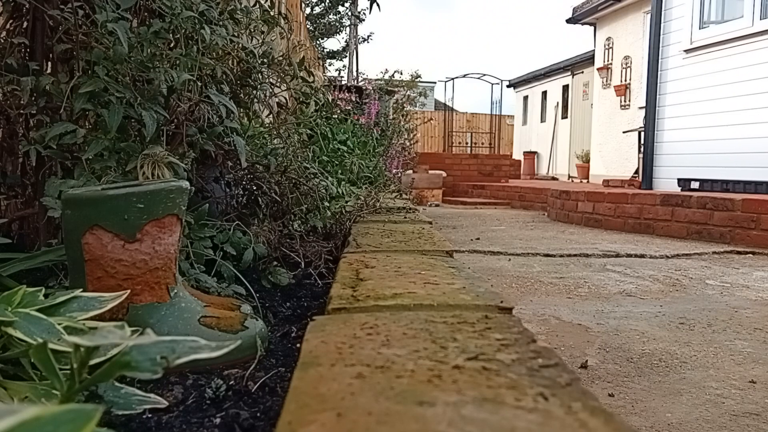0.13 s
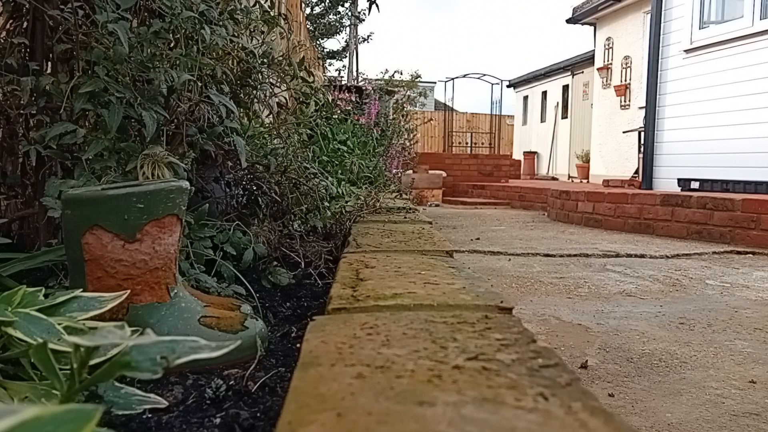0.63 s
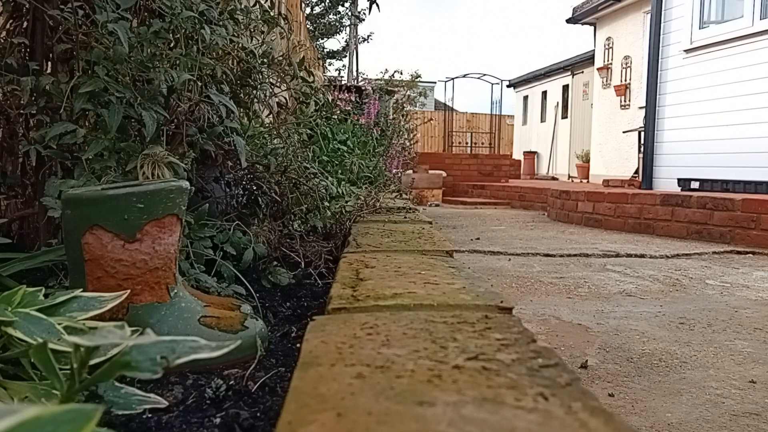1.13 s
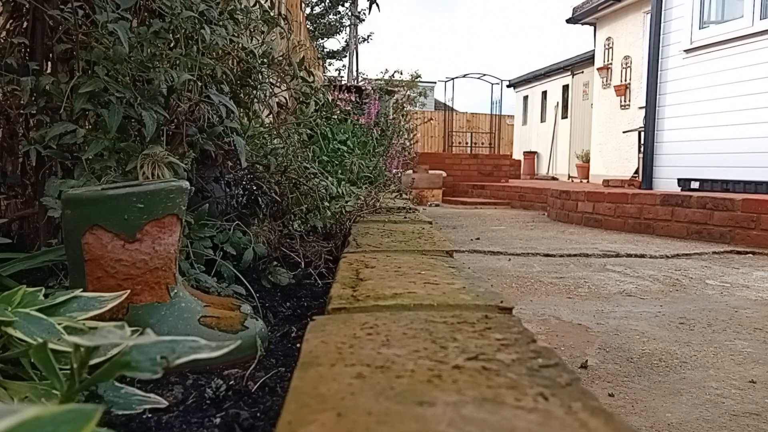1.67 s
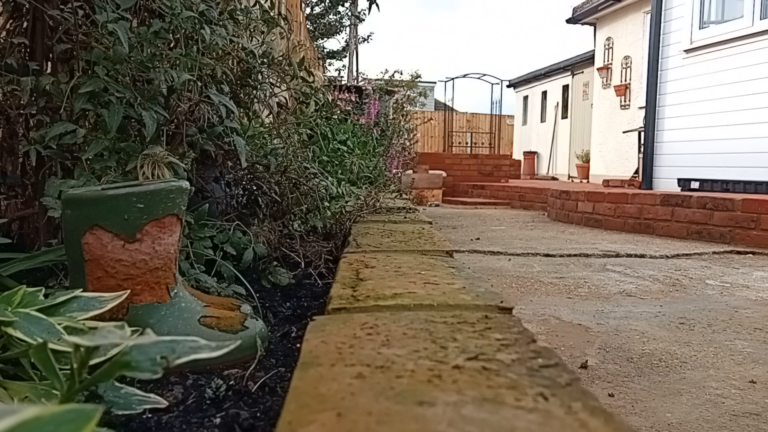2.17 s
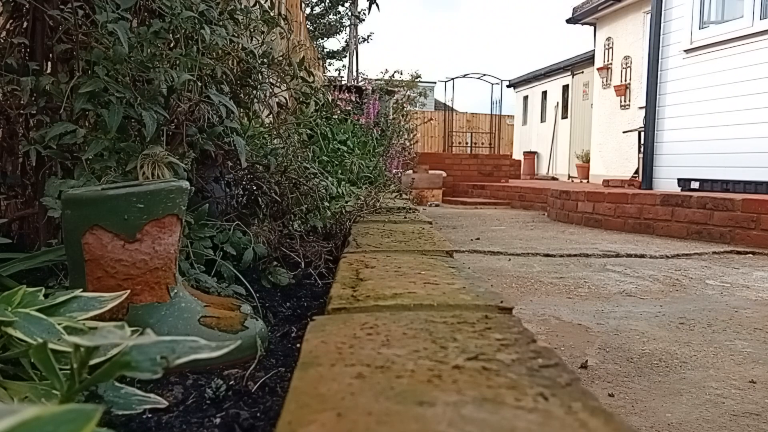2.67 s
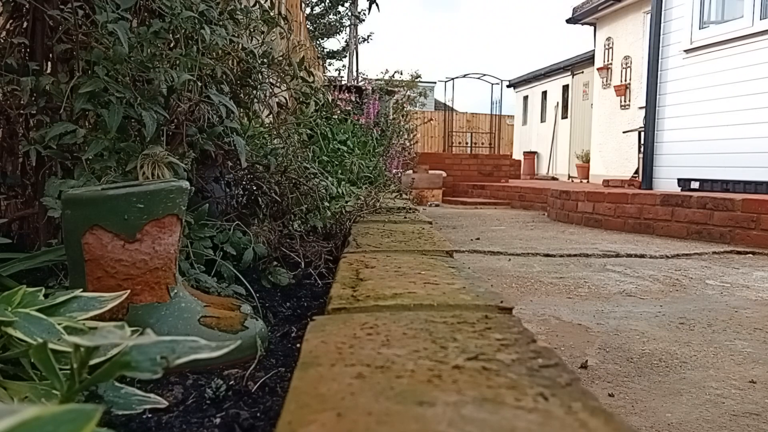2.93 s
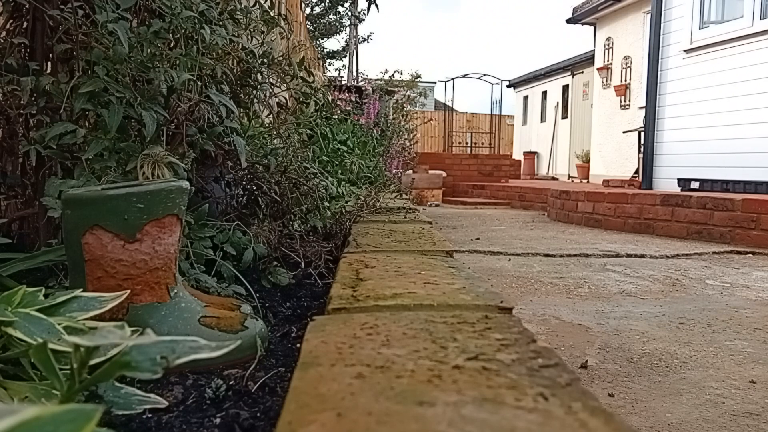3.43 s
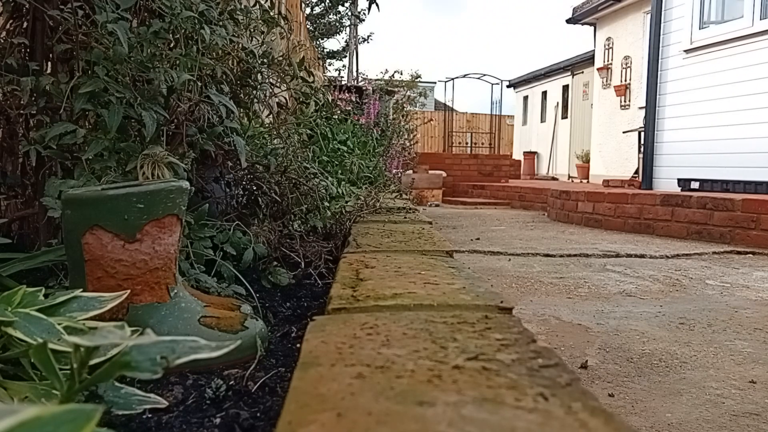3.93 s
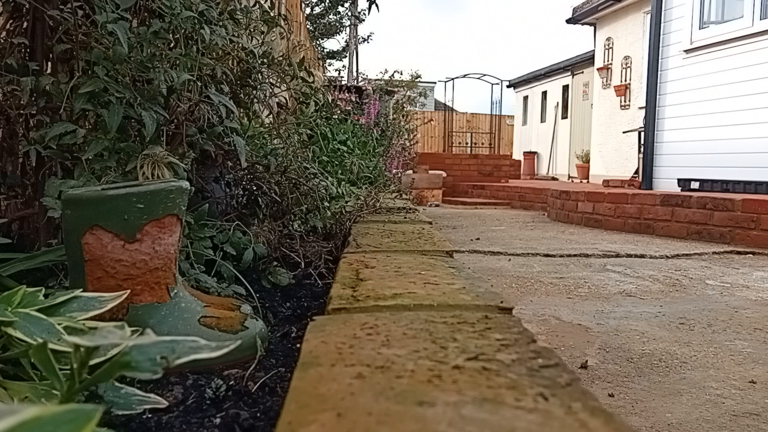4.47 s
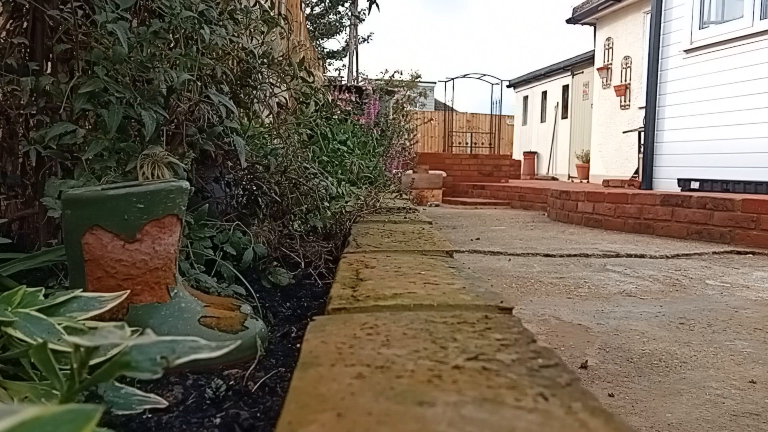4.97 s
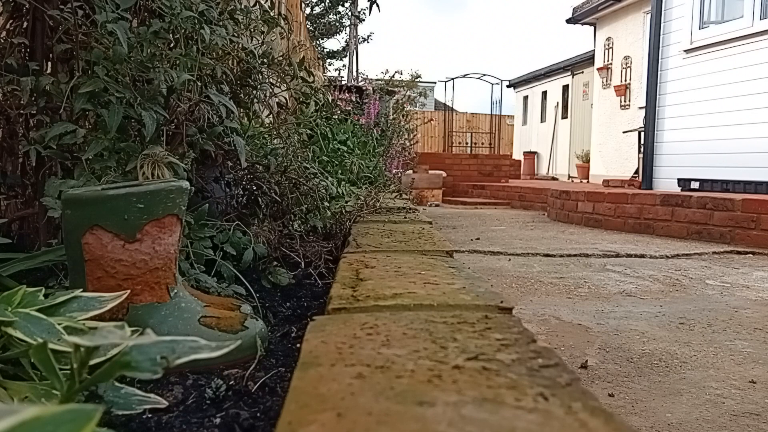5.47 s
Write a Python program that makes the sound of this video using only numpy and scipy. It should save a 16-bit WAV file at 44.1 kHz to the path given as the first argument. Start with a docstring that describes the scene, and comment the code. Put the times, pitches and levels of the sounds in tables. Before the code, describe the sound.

Quiet outdoor air, a soft low-weighted hiss, with a very faint distant engine hum near 68 hertz swelling and fading. At 1.32 s a tiny trigger tick, then at 1.33 s a gas-powered air rifle fires: a dense roaring burst of about 50 milliseconds with a low barrel ring. At 1.40 s the pellet cracks sharply on its target, and echoes from walls and paving die within about a third of a second. The limiter clamps the blast, so it sounds flattened. Close small clicks come at 2.0 s, a far echoing knock at 2.25 s and a fainter one at 2.5 s, with faint ringing tones. From 3.0 s bolt and magazine are handled close by: light ticks and scrapes at 3.4 to 4.3 s, strong metallic clacks at 4.45, 4.77 and 4.86 s. At 5.39 s a low soft bump as the rifle is set down, then a last faint tick at 5.5 s.

```python
"""Quiet outdoor air in a walled garden, hiss drawn as a spectrum, with a distant engine's low harmonics.
A gas-powered air rifle fires once: trigger tick, roaring gas over barrel modes, pellet strike, echoes.
Parts click close by; something far off knocks twice, heard as echo, and faint tones ring.
Then bolt and magazine are worked close by, noise bursts and grains through the rifle's resonances,
and the rifle is set down with a low bump. The recorder's limiter holds the blast down."""
import sys
import numpy as np
from scipy import signal
from scipy.io import wavfile
from scipy.ndimage import uniform_filter1d

SR = 44100
rng = np.random.default_rng(int(sys.argv[2]) if len(sys.argv) > 2 else 0)


def materialize(psi):
    """Save the field psi as 16-bit PCM at rate SR to the path in sys.argv[1].

    A 1-D psi becomes a single channel; in a 2-D psi each row is a channel.
    """
    bounded = np.clip(np.atleast_2d(psi).T, -1, 1)
    quanta = np.round(bounded * 32767).astype(np.int16)
    wavfile.write(sys.argv[1], SR, quanta)


def undo_db(level):
    """Turn decibels back into plain size, where 20 dB means ten times bigger."""
    steps = np.asarray(level, float) / 20
    return 10 ** steps


N = 246959


def evened(x):
    """Scales to rms 1."""
    return x / np.sqrt(np.mean(x ** 2) + 1e-20)


def unit(x):
    """Scales to energy 1."""
    return x / np.linalg.norm(x)


def smooth_noise(size, *lengths):
    """Slow random drift of rms 1: noise under moving averages of the given lengths in samples."""
    drift = rng.standard_normal(size)
    for length in lengths:
        drift = uniform_filter1d(drift, size=length)
    return evened(drift)


def read(points, hz):
    """Value of a table on a log-frequency axis."""
    f, value = np.transpose(points)
    return np.interp(np.log(hz + 1), np.log(f + 1), value)


def add(mix, start_s, sound):
    """Mixes a sound in at its start time."""
    part = mix[round(start_s * SR):][:len(sound)]
    part += sound[:len(part)]


def coloured(x, points):
    """Causal minimum-phase filter with the given dB spectrum."""
    log_gain = np.log(undo_db(read(points, abs(np.fft.fftfreq(4096, 1 / SR)))))
    taps = np.fft.ifft(np.exp(np.conj(signal.hilbert(log_gain)))).real[:2048]
    return signal.oaconvolve(x, taps)[:len(x)]


def band(x, lo_hz, hi_hz):
    """Band-pass."""
    sos = signal.butter(2, [lo_hz, min(hi_hz, .45 * SR)], "bandpass", fs=SR, output="sos")
    return signal.sosfilt(sos, x)


def ring(modes, size=8000):
    """Impulse response of dying modes (hz, level_db, t60_s)."""
    t = np.arange(size) / SR
    return sum(undo_db(db - 60 * t / t60) * np.sin(2 * np.pi * hz * t) for hz, db, t60 in modes)


def blast():
    """Turbulent gas roars out, slaps back off a near wall and pumps up the ringing of barrel and body."""
    # hiss of the gas jet: hz, relative level_db per Hz
    jet_colour = [(60, -21), (120, -8), (250, -2.5), (450, -2), (750, -5), (1200, -4), (3000, -5),
                  (7000, -4), (11000, -6.5), (16000, -8.5)]
    # low modes of barrel and body: hz, relative level_db, t60_s
    barrel = [(143, 10.5, 0.17), (240, -13.5, .12), (345, -8.5, .25), (560, -9.5, .1), (650, 4, .15),
              (946, -12.5, 0.089)]
    valve_open_s, valve_shut_s, build_s = 1.3281, 1.374, 0.0049
    slap_s, slap_db, slap_decay_s = 1.3605, 6, 0.012  # the blast's echo off a near wall lifts the hiss
    jet_db, jet_fade_db_per_s = 3.5, 898
    puff_db, puff_fade_db_per_s = -9.5, 299  # low puff in the barrel, relative to the jet, outlasts the hiss
    t = np.arange(N) / SR
    opening = 1 - np.exp(-np.maximum(t - valve_open_s, 0) / build_s)
    shut_for_s = np.maximum(t - valve_shut_s, 0)
    lift_db = (t > slap_s) * slap_db * np.exp(-np.maximum(t - slap_s, 0) / slap_decay_s)
    hiss_level = opening * undo_db(jet_db + lift_db - jet_fade_db_per_s * shut_for_s)
    out = evened(coloured(rng.standard_normal(N), jet_colour)) * hiss_level

    puff = opening * undo_db(jet_db + puff_db - puff_fade_db_per_s * shut_for_s)
    # the inner modes, equally strong and twice as damped
    damped = ring([(hz, 0, t60 / 2) for hz, _, t60 in barrel[1:-1]])
    out += puff * evened(signal.oaconvolve(band(rng.standard_normal(N), 200, 2000), damped)[:N])

    swell = 1 - np.exp(-(np.arange(20000) / SR / .03) ** 2)
    add(out, valve_open_s, undo_db(-1.5) * swell * ring(barrel, size=20000))
    return out


def strike():
    """The pellet cracks on the target, which rings briefly while fragments scatter as a fainter tail."""
    # modes of the target: hz, relative level_db, t60_s
    target = [(2000, 10, .014), (3000, -4, .004), (5000, -4, .016), (6100, -5, .004), (7500, -3, .004)]
    start_s, peak_db = 1.4022, 19
    t, out = np.arange(4000) / SR, np.zeros(N)
    crack = rng.standard_normal(len(t)) * (undo_db(-60 * t / .016) + undo_db(-9 - 60 * t / 0.09))
    ringing = signal.fftconvolve(crack, ring(target, size=3000))[:len(t)]
    sound = unit(ringing) + unit(band(band(crack, 1400, 9000), 1300, 10000))
    add(out, start_s, undo_db(peak_db) * sound / abs(sound).max())
    return out


def modes_of(drive, modes):
    """A drive through resonances (hz, width_hz, level_db), at rms 1; wider modes die sooner."""
    response = ring([(hz, db, 2.2 / max(width, 80)) for hz, width, db in modes], size=3000)
    ringing = signal.fftconvolve(drive, response)[:len(drive)]
    return evened(band(band(ringing, 720, 17000), 650, 17000))


def rifle_body(drive, ring_hz, ring_db, wood_db, edge_db, focus_db):
    """A drive heard as plain snap, bright edge, wooden knock and the modes nearest the place of contact."""
    # resonances of the metal parts: hz, width_hz, relative level_db
    metal = [(2599, 147, 0), (3045, 200, 1.5), (3560, 97, -2), (4367, 250, -7), (5240, 220, 1.5),
             (5980, 36, 1), (5740, 30, -4), (9233, 71, -2), (9800, 250, -9.5), (9540, 290, -3.5)]
    # resonances of the stock: hz, width_hz, relative level_db
    stock = [(770, 75, -6), (950, 70, -4.5), (1070, 131.3, 1), (1332, 82, -1.5), (1514, 80, -3),
             (1800, 150, 0.5), (2050, 130, -2.5)]
    # every contact excites the modes a little differently
    scatter_db, scatter_share = 3.5, .03
    thud_db, edge_top_db = -10.5, 2  # low thud under the wooden knock; highest treble in the bright edge
    near = []
    luck = rng.standard_normal((len(stock + metal), 2))
    for (hz, width, db), (tuning, strength) in zip(stock + metal, luck):
        distance_db = focus_db * np.log2(hz / ring_hz) ** 2
        near.append((hz * (1 + scatter_share * tuning), width, db + scatter_db * strength - distance_db))
    snap = band(band(drive, 1700, 7500), 1200, 9000)
    edge = band(drive, 8500, 11500) + undo_db(edge_top_db) * band(drive, 11500, 18000)
    plain = 1.4 * evened(snap) + undo_db(edge_db) * evened(edge)
    thud = band(band(drive, 400, 800), 380, 850)
    wood = modes_of(drive, stock) + undo_db(thud_db) * evened(thud)
    return plain + undo_db(wood_db) * wood + undo_db(ring_db) * modes_of(drive, near)


def clicks():
    """Each click is a burst of tiny impacts that dies fast, with a faint short echo off paving or wall."""
    # the sear lets go: start_s, peak_db, ring_hz, wood_db (wooden knock), edge_db (bright edge)
    trigger = (1.3165, -31, 6000, -30, 4)
    # close clicks of the rifle's parts: start_s, peak_db, ring_hz, wood_db, edge_db
    parts = [(1.984, -26.5, 2937, -34, 9), (2, -24.5, 1938, -40, -1), (2.016, -34, 1922, -29, -2),
             (3.022, -39, 1320, 11, -39), (3.399, -25, 5600, -32.5, 15.5), (3.412, -55, 6100, -25, -13),
             (3.464, -45, 6440, -30, -24.5), (3.487, -50, 5400, -22, -5), (3.615, -44.5, 894, 39, -12),
             (3.651, -37.5, 5130, 1, -2), (3.76, -31, 3430, -20, -34), (3.763, -31, 1180, -10, -30),
             (3.851, -41.5, 2490, -2, 1), (4.015, -45.5, 856, -17.5, 3.5), (4.211, -27.5, 2700, 2, -29),
             (4.332, -35, 5205, -29, 13), (4.446, -18.5, 6570, -12, -27), (4.453, -32.5, 6040, -31, 2),
             (4.463, -11, 6800, -38, -1), (4.467, -13.5, 2376, -46, -1.5), (4.602, -46.5, 1380, -31, -1),
             (4.766, -14, 4210, 1, 3), (4.779, -31.5, 2030, -23, -6), (4.843, -25, 5500, -25, -30),
             (4.86, -21, 5350, -30, -29), (4.866, -18, 4260, 7, -28), (4.875, -23, 2010, 1, -27),
             (4.978, -49.5, 5980, -17, 6), (5.171, -51.5, 6200, -22, 5), (5.394, -23, 796, 3.5, 0.5),
             (5.518, -42.5, 5270, -11, 6)]
    t, out = np.arange(5000) / SR, np.zeros(N)
    near_echo = undo_db(-21.5 - 60 * t / 0.11)
    burst = (1 - np.exp(-t / 0.00057)) * (undo_db(-60 * t / 0.021) + near_echo)
    for start_s, peak_db, ring_hz, wood_db, edge_db in [trigger] + parts:
        impacts = rng.standard_normal(len(t)) * burst
        sound = rifle_body(impacts, ring_hz, 5.5, wood_db, edge_db, focus_db=69.5)
        add(out, start_s - .001, undo_db(peak_db) * sound / abs(sound).max())  # placed 1 ms early
    return out


def slides_and_rattles():
    """Sliding, rattling after clicks and one click's echo: dense uneven grains that swell and fade."""
    # parts and hands sliding on the rifle, rattling after clicks, and at 4.516 s the echo of a click:
    # peak_s, fall_s, relative level_db, ring_hz, edge_db (bright edge)
    strokes = [(2.006, .049, -53, 2566, 4.5), (2.138, 0.056, -73, 2430, -3),
               (3.196, .04, -70.5, 9870, 14.5), (3.228, .084, -70.5, 3580, -20),
               (3.418, .035, -54.5, 5980, 12), (3.44, 0.056, -71, 954, -22), (3.477, .02, -58.5, 6680, 5),
               (3.59, .055, -67.5, 5170, 3), (3.623, 0.021, -67.5, 1017, -21),
               (3.672, .035, -63.5, 3140, -4), (3.676, .035, -69.5, 1420, -14),
               (3.772, .021, -59, 2500, -28), (4.025, .025, -73.5, 1845, 5.5),
               (4.226, 0.01, -68, 2590, -15), (4.314, .045, -70.5, 2820, -10.5),
               (4.441, 0.015, -46.5, 2950, 6.5), (4.476, 0.0052, -50, 2300, -3.5),
               (4.516, .06, -54, 3560, -15), (4.81, 0.042, -57.5, 1820, -23),
               (4.851, .02, -43.5, 3400, -19), (4.87, 0.022, -42, 2600, -17),
               (5.392, .014, -49.5, 3100, 17), (5.409, 0.011, -57.5, 1830, 2),
               (5.552, 0.034, -69, 9400, 6.5)]
    out = np.zeros(N)
    for peak_s, fall_s, db, ring_hz, edge_db in strokes:
        rise_s = 0.54 * fall_s
        t = np.arange(-2 * rise_s, 3 * fall_s + .03, 1 / SR)
        stroke = np.exp(-2 * np.where(t < 0, (t / rise_s) ** 2, (abs(t) / fall_s) ** 1.15))
        grain, unevenness = rng.standard_normal((2, 20000))[:, :len(t)]
        grains = grain * undo_db(3 * evened(uniform_filter1d(unevenness, size=120)))
        sound = rifle_body(grains * stroke, ring_hz, ring_db=9.5, wood_db=-6, edge_db=edge_db, focus_db=12)
        add(out, peak_s + t[0], undo_db(db) * sound * np.sqrt(np.mean(stroke ** 2)))
    return out


def pings_and_bump():
    """Faint ringing tones of unsteady strength, and the low bump of the rifle set down."""
    # faint ringing tones, and at 5.393 s the low bump of the rifle set down:
    # start_s, hz, level_db (before the wavering), t60_s
    tones = [(2.533, 2300, -54, .3), (2.105, 880, -64, .3), (2.148, 870, -59, .15), (3.41, 950, -59, .35),
             (3.58, 2500, -63, .3), (3.66, 1450, -60, .15), (3.68, 3200, -62, .2), (4.722, 3800, -60, .1),
             (5.393, 300, -47, .08), (5.394, 830, -47, .04), (5.41, 660, -54, .25), (5.49, 3550, -66, .3)]
    t, out = np.arange(8000) / SR, np.zeros(N)
    for start_s, hz, db, t60 in tones:
        waver = 1 + .5 * smooth_noise(len(t), 500)
        add(out, start_s, (1 - np.exp(-t / .003)) * waver * ring([(hz, db, t60)]))
    return out


def knocks():
    """Single far blows: coloured impulses, to be heard only through the garden's echo."""
    # far blows: start_s, energy level_db, colour as (hz, relative level_db per Hz)
    blows = [(2.247, 2.5, [(120, -29), (230, -7.5), (450, -15), (800, -12.5), (1300, -14), (2200, 0.5),
             (2900, -7.5), (3800, -0.5), (5000, -6), (7000, -10), (8500, -20.5), (16000, -53)]),
             (2.4964, -13.5, [(880, -51), (1500, -31), (2860, -16), (3370, -10), (5730, -6), (6470, -18.5),
             (7180, 2), (7900, -26), (12000, -44), (15600, -103), (22000, -120)])]
    out = np.zeros(N)
    for start_s, db, colour in blows:
        add(out, start_s, undo_db(db) * unit(coloured(signal.unit_impulse(2048), colour)))
    return out


def garden(x, build_s):
    """Echoes off walls, fence and paving: scattered taps that build up, then die band by band."""
    # how long the garden rings: hz, t60_s
    decay = [(150, .16), (300, 0.3), (600, 0.22), (1100, 0.28), (1800, 0.35), (2600, 0.32), (4000, 0.32),
             (9000, 0.28), (16000, 0.22)]
    taps = np.zeros(SR)
    at = np.arange(0, SR - 16, 16)
    places = at + rng.integers(0, 16, len(at))
    signs = rng.choice([-1., 1.], len(at))
    taps[places] = signs * undo_db(2.5 * rng.standard_normal(len(at)))
    hz, t, z = signal.stft(taps, SR, nperseg=256)
    tail = signal.istft(z * undo_db(-60 * t / read(decay, hz)[:, None]), SR, nperseg=256)[1]
    tail = tail * (1 - np.exp(-(np.arange(len(tail)) / SR / build_s) ** 2))
    return signal.fftconvolve(x, unit(tail))[:N]


def drone():
    """Low harmonics of a distant engine swell and fade as the sound carries unevenly; all flutter."""
    # slow swell before the flutter: time_s, first_db (fundamental), second_db (second harmonic)
    swell = [(0.0, -59.5, -75), (0.2, -77, -67), (0.41, -52, -66.5), (0.55, -49, -72), (0.74, -54.5, -76),
             (0.9, -79, -64), (1.17, -49, -70), (1.33, -52, -85), (1.428, -73, -76), (1.53, -47.5, -78),
             (1.661, -60.5, -88), (1.779, -82, -82), (2.03, -50, -70), (2.36, -48.5, -62),
             (2.561, -46.5, -52.5), (2.879, -51, -72), (3.339, -65.5, -79), (3.62, -84, -73),
             (3.9, -52, -81), (4.03, -48.5, -63), (4.2, -51, -76), (4.489, -82.5, -91), (4.779, -63, -90),
             (4.95, -50, -77), (5.18, -55.5, -87), (5.42, -73, -87), (5.6, -99, -95)]
    # pitch of the engine: time_s, firing_hz
    pitch = [(0, 69.1), (.5, 66.3), (1.4, 69), (2.6, 66.54), (5, 68.8), (5.6, 66)]
    t = np.arange(N) / SR
    time_s, first_db, second_db = np.transpose(swell)
    second_flutter_db = 5.5 * smooth_noise(N, 1500, 1500)
    first_flutter_db = 4 * smooth_noise(N, 2000, 2000)
    first = undo_db(np.interp(t, time_s, first_db) + first_flutter_db)
    second = undo_db(np.interp(t, time_s, second_db) + second_flutter_db)
    angle = 2 * np.pi * np.cumsum(np.interp(t, *np.transpose(pitch))) / SR
    third = undo_db(-23.5) * first * np.sin(3 * angle)  # follows the fundamental
    return np.sqrt(2) * (first * np.sin(angle) + second * np.sin(2 * angle) + third)


def air():
    """Quiet outdoor hiss and rumble: a random spectrum with faint drifting patches."""
    # colour of the air: hz, relative level_db per Hz
    colour = [(30, -3.5), (60, -1), (150, -0.5), (400, -7), (1000, -15), (2500, -17), (6000, -22),
              (9500, -27), (13000, -32.5), (16000, -29)]
    frames, hz = N // 256 + 5, np.fft.rfftfreq(1024, 1 / SR)
    real, imaginary, patches = rng.standard_normal((frames, 513, 3)).T
    patches = uniform_filter1d(patches, size=10, axis=0)  # over frequency
    patches = evened(uniform_filter1d(patches, size=16, axis=1))  # over time
    z = (real + 1j * imaginary) * undo_db(read(colour, hz)[:, None] + 2 * patches)
    return undo_db(-64) * evened(signal.istft(z, nperseg=1024, noverlap=768)[1][:N])


def scene():
    """All sources with their echoes, as one channel."""
    muzzle, hit, handling = blast(), strike(), clicks() + slides_and_rattles()
    echoes = garden(undo_db(-12.0) * muzzle + undo_db(-13.5) * hit, build_s=.015)
    echoes += undo_db(-24) * garden(handling, build_s=0.017)
    echoes += garden(knocks(), build_s=0.00047)
    return (muzzle + hit + handling + echoes + pings_and_bump() + drone() + air())[None]


def band_limit(x):
    """A steep low-pass at the top of the band."""
    return signal.sosfilt(signal.butter(12, 16990, fs=SR, output="sos"), x)


def record(dry):
    """Microphone colour, then a limiter that clamps on short-term power and lets go at a steady rate."""
    # microphone response: hz, level_db
    mic = [(25, -15.5), (60, -5.5), (6500, -2), (8000, -9), (9500, 0.5), (11000, -0.5), (12800, -10.5),
           (14000, -9.5)]
    # steep fall at the top of the response: hz, level_db
    mic_edge = [(14700, -1), (15600, 0), (15850, -4), (16050, -28), (22050, -40)]
    ceiling_db, release_db_per_s = -19.5, 210
    x = coloured(dry[0], mic + mic_edge)
    keep = np.exp(-1 / (.0025 * SR))  # power averaged over 2.5 ms
    power_db = 10 * np.log10(signal.lfilter([1 - keep], [1, -keep], x ** 2) + 1e-12)
    release_db = np.arange(N) / SR * release_db_per_s
    held_power_db = np.maximum.accumulate(power_db + release_db) - release_db
    over_db = np.maximum(held_power_db - ceiling_db, 0)
    held = .5 * np.tanh(x / undo_db(0.99 * over_db) / .5)  # soft clipping at half of full scale
    return band_limit(held[None])


dry = scene()
out = record(dry)
materialize(out)
```